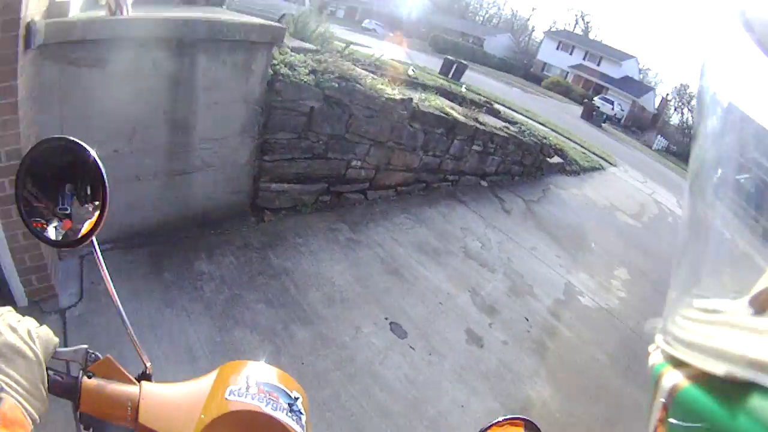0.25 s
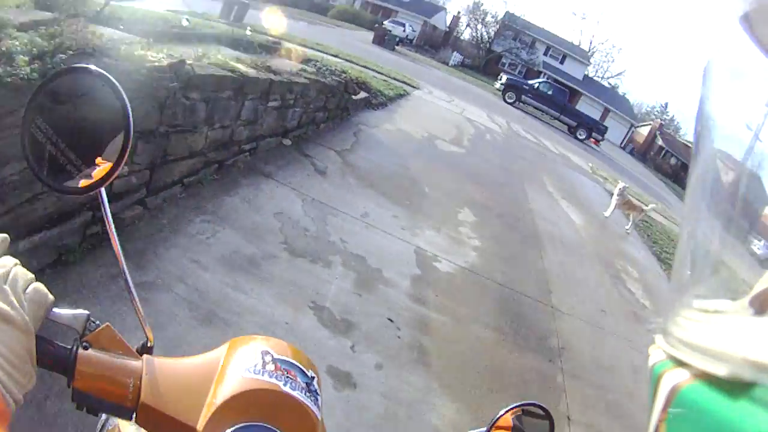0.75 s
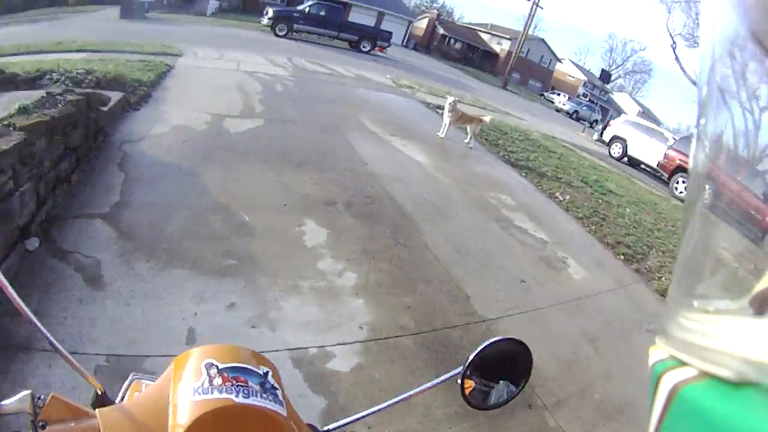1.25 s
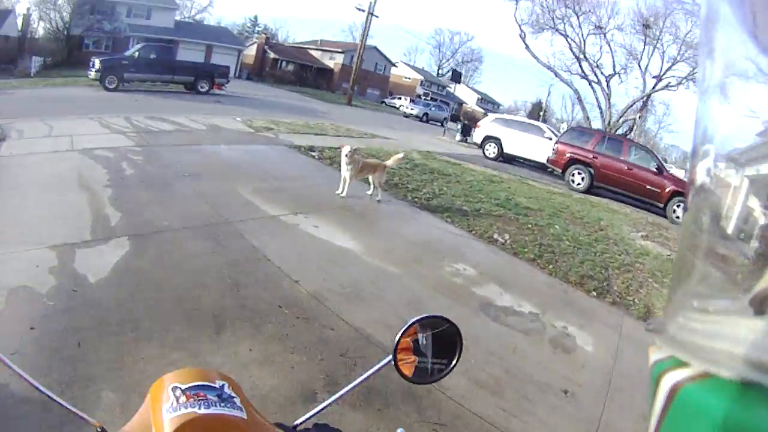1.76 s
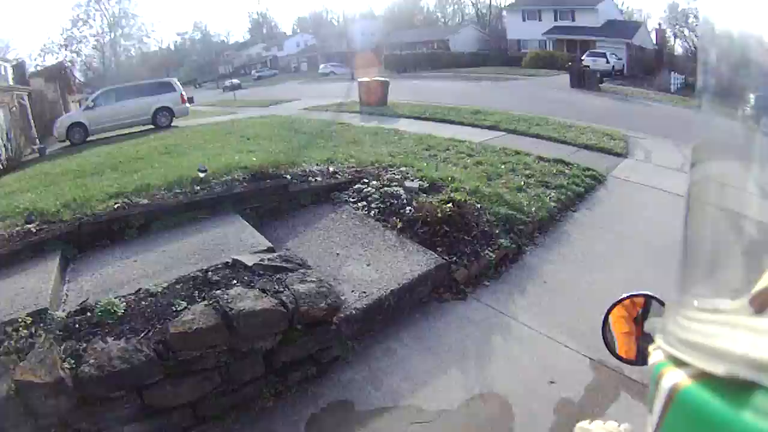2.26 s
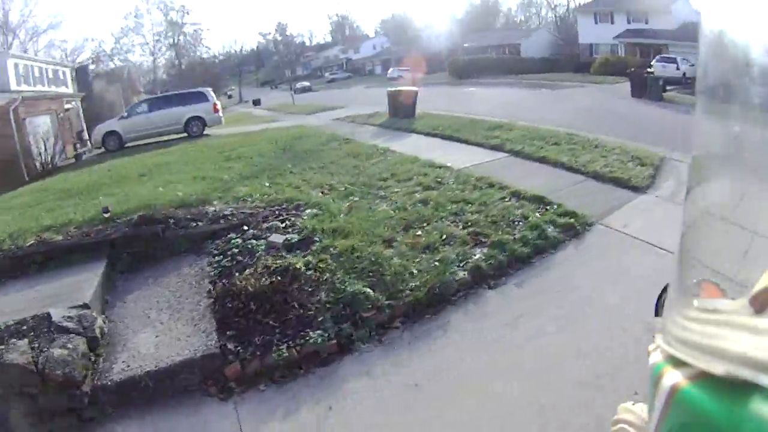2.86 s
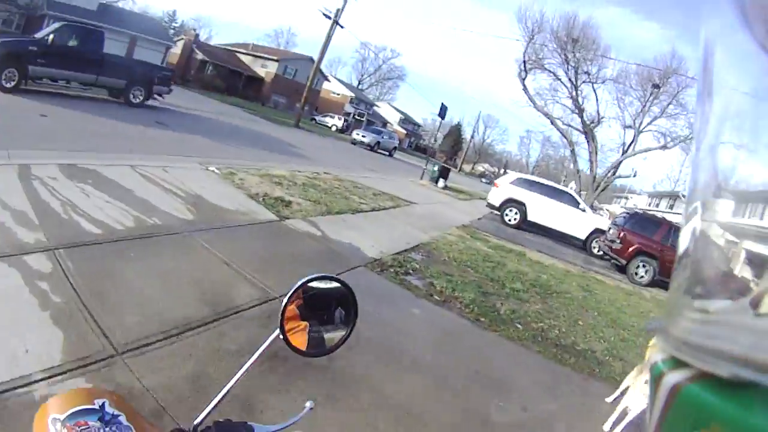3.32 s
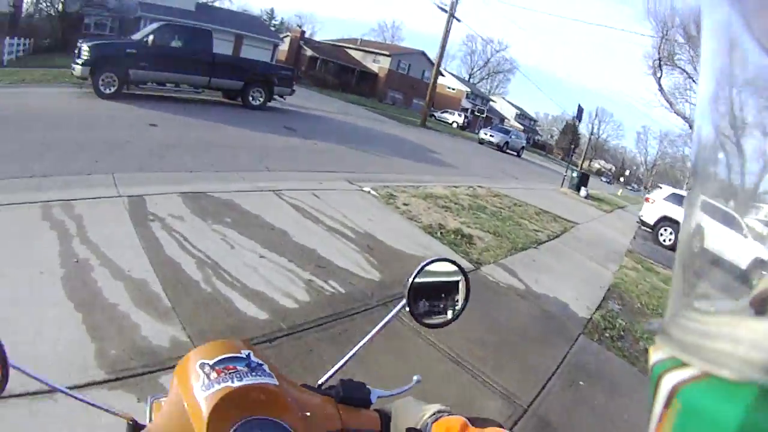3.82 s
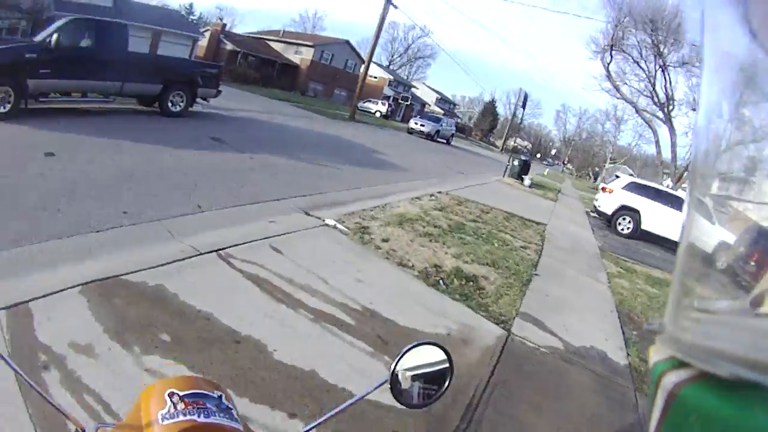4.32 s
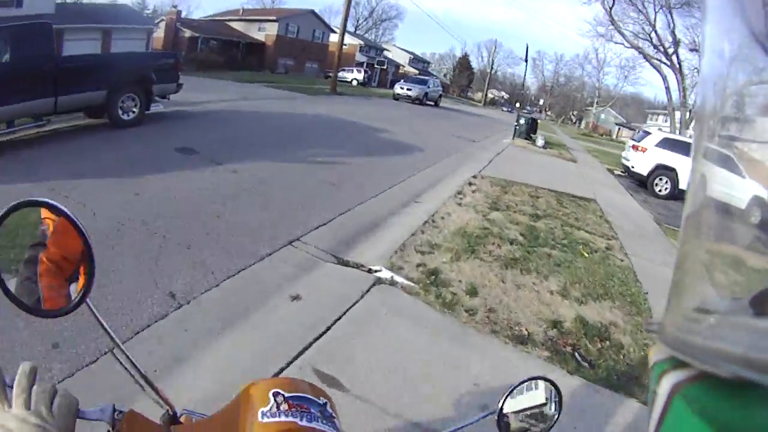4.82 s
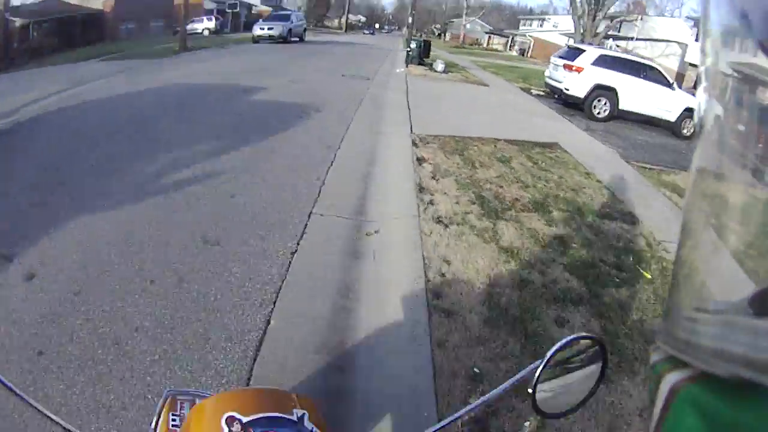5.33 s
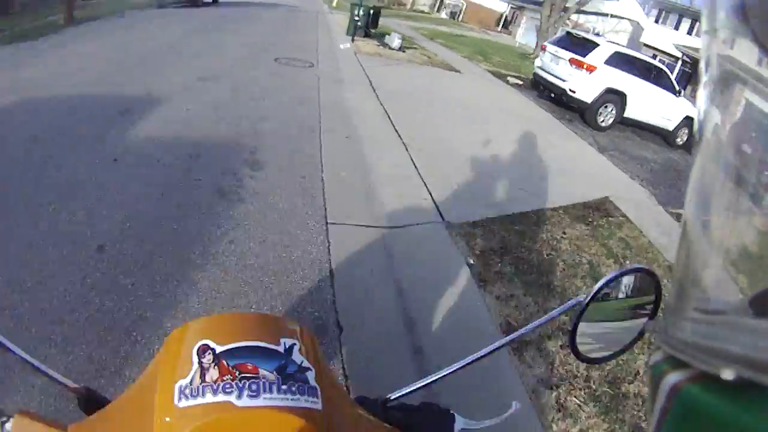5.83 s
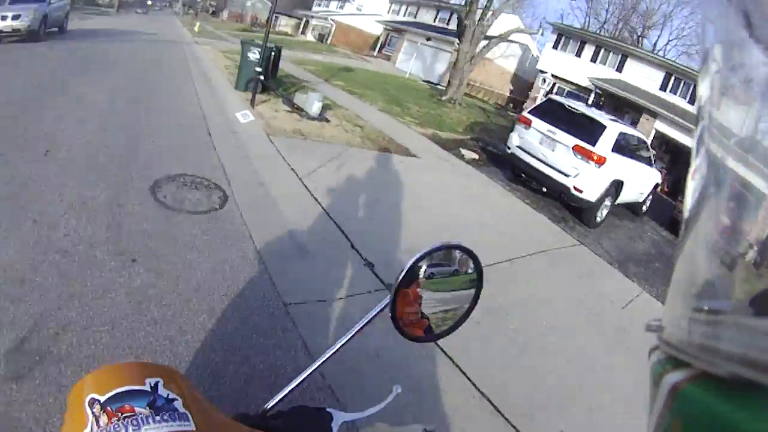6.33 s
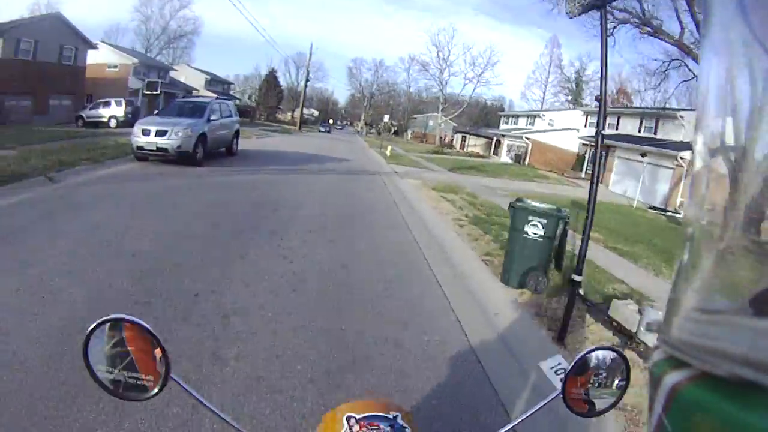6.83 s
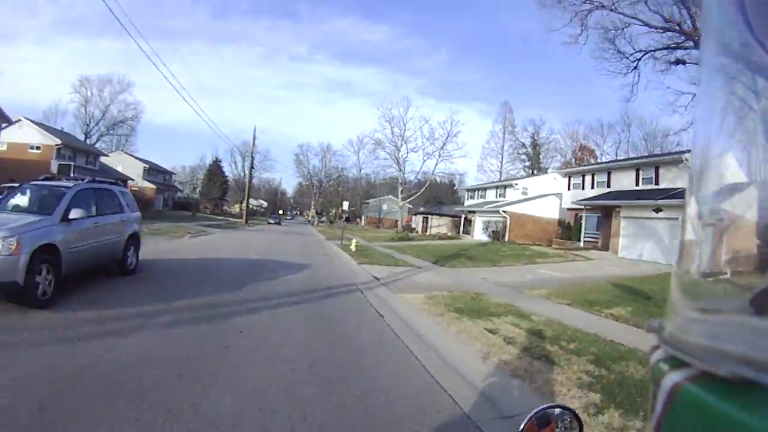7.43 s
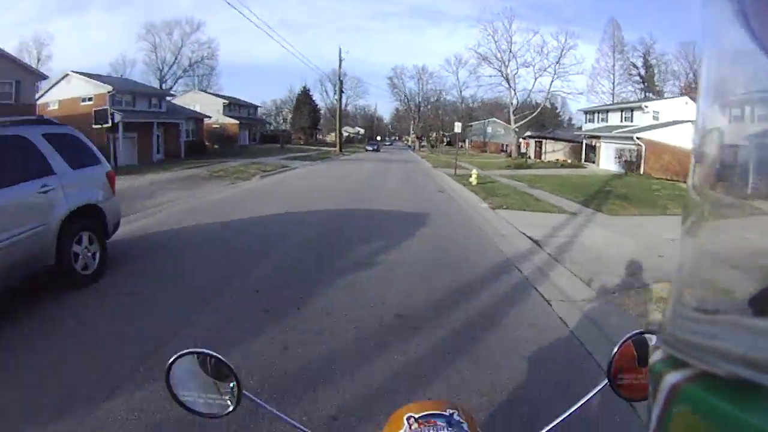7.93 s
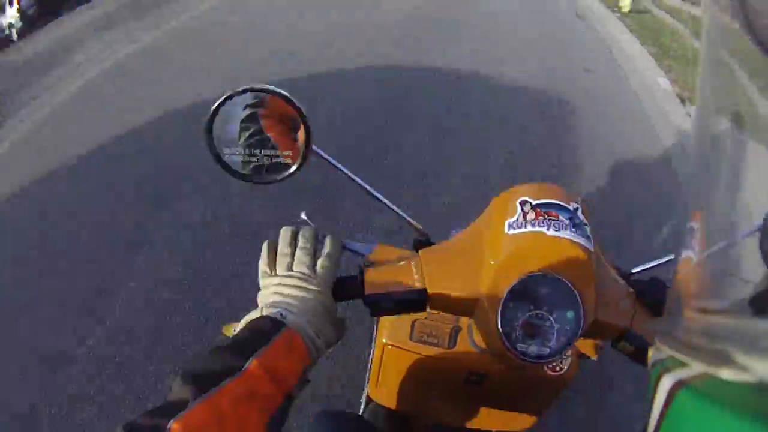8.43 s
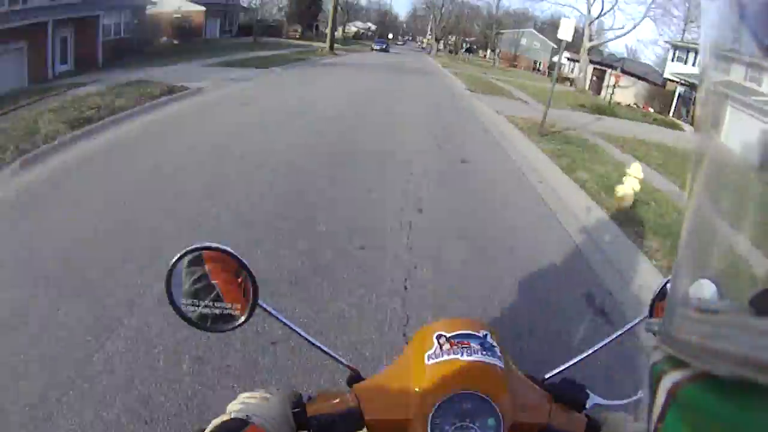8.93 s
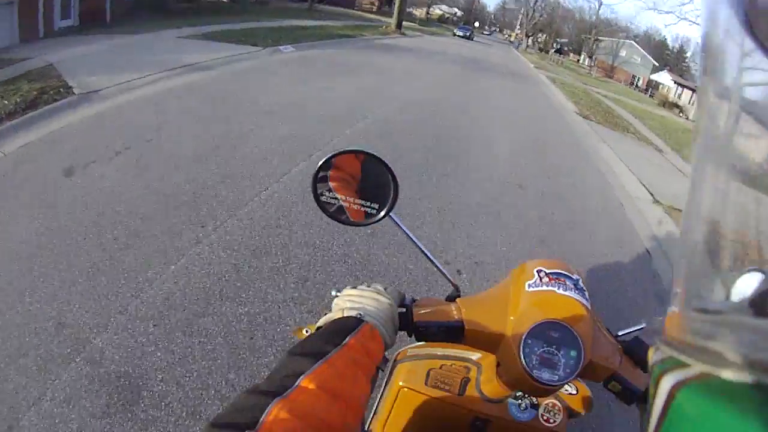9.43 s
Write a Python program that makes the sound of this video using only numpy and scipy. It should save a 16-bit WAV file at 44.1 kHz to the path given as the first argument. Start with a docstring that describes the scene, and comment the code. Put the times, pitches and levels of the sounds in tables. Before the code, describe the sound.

Close from the rider's helmet, an old two-stroke scooter sputters at idle with uneven, hollow exhaust pops and metallic clatter. It rolls down a driveway, rumbling over joints with a hard clunk, then pops louder. The putts merge into a rising buzz, drop and stutter at the gear change, then climb again on the street. Finally wind buffets the microphone over a fading engine.

```python
"""An old two-stroke scooter engine, heard from the rider's helmet, idles unevenly and fires on only some crank turns.
The scooter rolls down a driveway with a clunk, revs through first gear, shifts, and revs again.
Each firing is a click with a puff of noise that sets filters and decaying tones ringing: exhaust, intake, metal.
Most engine parts follow one crank speed curve; lone firings and scrapes have their own times.
Tyres and frame are filtered noise and clicks; filtered noise is also the wind as the rider looks down at speed."""
import sys
import numpy as np
from scipy import signal
from scipy.fft import rfft, irfft
from scipy.io import wavfile
from scipy.ndimage import uniform_filter1d

SR = 44100
rng = np.random.default_rng(int(sys.argv[2]) if len(sys.argv) > 2 else 0)


def wrap_up_sound(samples):
    """Save the sound to the file named by the first command line argument, as 16-bit audio."""
    columns = np.atleast_2d(samples).T
    # keep every value between -1 and 1, then stretch to whole-number steps
    tamed = np.clip(columns, -1, 1)
    steps = np.round(tamed * 32767).astype(np.int16)
    wavfile.write(sys.argv[1], SR, steps)


N = 426447
TIME = np.arange(N) / SR   # the time of every sample, in seconds

# how fast the crank turns: t/s, speed/(turns per s)
CRANK_SPEED = [(0.0, 36.92), (0.713, 41.43), (0.975, 35.19), (1.361, 46.49), (1.775, 43.41), (2.012, 51.2),
               (2.447, 45.84), (3.47, 47.08), (4.046, 38.47), (4.634, 44.76), (5.128, 56.82), (5.39, 65.76),
               (6.036, 78.69), (6.379, 81.5), (6.72, 66.2), (6.8, 58.5), (7.117, 60.75), (7.656, 68.92),
               (8.166, 79.85), (8.82, 86.0), (9.2, 63.0), (9.67, 69.0)]
# lone firings: t/s, strength/dB
POPS = [(.072, -11), (.384, -11.5), (.778, -13), (1.463, -12.5), (1.606, -18), (1.647, -19), (1.706, -16.5),
        (1.75, -14.5), (1.821, -7.5), (1.998, -10), (2.179, -21), (2.35, -16.5), (2.506, -16), (2.674, -12),
        (3.089, -10), (3.261, -7.5), (3.352, -3.5), (3.396, -7), (3.603, -10.5), (3.714, -8.5), (3.807, -9),
        (3.903, -9.5), (4.005, -8), (4.472, -11), (4.586, -8.5), (6.36, -14.5), (6.738, -5.5), (6.802, -8),
        (6.836, -10.5)]
# stretches of firing on every turn: first t/s, last t/s, strength/dB
RUNS = [(0.66, 0.728, -15), (0.829, 1.4, -16), (1.842, 1.906, -14.5), (1.946, 1.983, -22.5),
        (3.417, 3.456, -14), (4.495, 4.54, -14), (4.608, 4.998, -13.5), (5.015, 5.276, -15.5),
        (5.802, 5.843, -16), (5.867, 5.995, -17), (7.137, 7.171, -16.5), (7.202, 7.282, -17.5),
        (7.313, 8.147, -18), (8.16, 8.821, -23), (9.092, 9.66, -26.5)]
# stuttering, a few firings and then a miss: first t/s, last t/s, strength/dB, firings in a row/count
STUTTERS = [(0.208, 0.309, -13.5, 1), (0.487, 0.633, -14, 1), (2.801, 2.933, -18.5, 1),
            (4.081, 4.425, -11, 1), (5.308, 5.387, -16.5, 2), (5.417, 5.532, -16, 2),
            (5.563, 5.678, -16.5, 2), (5.704, 5.773, -16, 2), (6.024, 6.164, -18.5, 2),
            (6.186, 6.31, -18, 1), (6.872, 7.104, -17, 2)]
FIRING_SCATTER_DB = 1.1
FRESH_CHARGE_DB = 2.5   # extra strength after a miss, and at the start of a stretch
STEADY_TURNS_PER_S = 60   # above this speed the firings grow more even

# note of the tailpipe, which follows the gas temperature: t/s, f/Hz
PIPE_NOTE = [(0, 503), (.25, 535), (.39, 520), (.6, 560), (.72, 497), (.84, 560), (.93, 483), (1.02, 487),
             (1.35, 571), (1.6, 452), (1.9, 595), (2.6, 523), (4.6, 520.6), (5.1, 529), (5.36, 534),
             (5.52, 450), (6.2, 693), (7.4, 565), (8.1, 604)]
# part of the exhaust note that goes through the tailpipe's narrow resonance: t/s, share/(0 to 1)
SINGING_SHARE = [(0, 0.83), (.75, 0.61), (1.0, 0.35), (1.33, 0.93), (1.5, 0.4), (3.3, 0.28), (4.9, 0.62),
                 (5.4, 0.18), (9.67, 0)]
# fast flow damps the pipe's echoes: the loss per pass grows as a power of the speed gained above idle
IDLE_TURNS_PER_S, PIPE_IDLE_LOSS_DB, PIPE_ADDED_LOSS_DB, PIPE_LOSS_POWER = 37.3, 7.5, 21.5, 1.3
# tone colour of the exhaust: f/Hz, level/dB
EXHAUST_COLOUR = [(40, -63), (150, -28), (300, -9.5), (400, 2.5), (480, 5.5), (600, -0.5), (720, 2),
                  (800, -14.5), (1000, -33.5), (1250, -44), (2400, -65.5), (7000, -105)]
# silencer resonances, as bumps and dips in that colour: f/Hz, width/Hz, level/dB
SILENCER = [(464.7, 54, 8), (565.6, 56, 8), (560, 340, -5.5), (678.7, 78, 8.5)]
# a dip in the exhaust's tone colour near 960 Hz: f/Hz, width/Hz, level/dB
EXHAUST_DIP = [(960, 130, -8)]
# relative level of the low exhaust note: t/s, level/dB
THUMP_LEVEL = [(0, 6.5), (1.05, 6.5), (1.3, 11.5), (2.3, 3), (4.3, 8), (5.1, 11), (6.2, 7), (7.3, 13),
               (8.7, 7.5), (9.67, 18.5)]
# tone colour of the low exhaust note: f/Hz, level/dB
THUMP_COLOUR = [(30, -46), (70, -26), (120, -19.5), (250, 1.5), (330, -13), (500, -12), (1500, -76),
                (5000, -97)]
# airbox resonances, as bumps and dips in that colour: f/Hz, width/Hz, level/dB
AIRBOX = [(160.4, 54, 15.5), (183.2, 95, -13), (275.8, 8.1, 6)]
# the deepest part of the low note grows with the revs
DEEP_HZ, DEEP_FULL_TURNS_PER_S, DEEP_GROWTH = 170, 110, 0.94
# relative level of the hollow bark of the firings: t/s, level/dB
BARK_LEVEL = [(1.9, -27), (2.35, -5), (3.1, -3.5), (3.3, -45), (5.5, -17.5), (9.67, -11)]
# ringing tones of the bark: f/Hz, level/dB, time to fall by 60 dB/s
BARK_MODES = [(945, -7.5, 0.076), (1015, -9.5, 0.071), (1104, -17.5, 0.083)]
# tone colour of the rasp and of the shaking panels: f/Hz, level/dB
RASP_COLOUR = [(50, -54.5), (300, -9.5), (700, 4), (900, 10), (1150, -8), (1500, 0.5), (1900, -12.5),
               (2350, -12.5), (3000, -29), (4500, -32.5), (6500, -46), (8000, -52), (14000, -63.5)]
# moments when the silencer rings on between firings: first t/s, last t/s, f/Hz, level/dB
DRONES = [(0.912, 1.04, 470.4, -27), (1.888, 1.95, 725, -29), (1.975, 2.003, 551.3, -23),
          (2.166, 2.19, 545, -19.5)]
DRONE_T60_S = 0.33   # time to fall by 60 dB
# swells of one crank harmonic in a silencer resonance: first t/s, last t/s, multiple of crank speed, level/dB
HUMS = [(.93, 1.05, 21, -33.5), (1.814, 1.89, 5, -28.5), (1.91, 2.122, 14, -31), (6.56, 6.694, 8, -39.5),
        (6.583, 6.698, 7, -34), (6.403, 6.66, 6, -40), (7.85, 8.13, 4, -35)]
# level of the bright spit of gas with each firing: t/s, level/dB
SPIT_LEVEL = [(0, -47.5), (.7, -55.5), (.9, -47.5), (1.1, -58.5), (1.35, -49.5), (2.6, -49.5), (3.4, -60),
              (4.3, -51), (4.8, -64), (5.3, -56), (5.55, -46.5), (6.1, -64), (6.9, -51.5), (7.5, -68.5),
              (9.67, -60.5)]
# tone colour of the spit: f/Hz, level/dB
SPIT_COLOUR = [(400, -22), (1100, 11), (1700, 4.5), (2300, 0.5), (2800, -10), (3300, -5.5), (4000, -20),
               (5000, -20.5), (6300, -22.5), (7500, -36.5), (14000, -40.5)]

# level of the intake's gulp: t/s, level/dB
GULP_LEVEL = [(0, -43), (4.5, -35), (5.2, -34), (6.0, -25), (7.0, -24.5), (7.7, -18.5), (8.15, -21.5),
              (9.0, -42.5), (9.67, -33)]
# tone colour of the intake: f/Hz, level/dB
INTAKE_COLOUR = [(40, -47.5), (140, -5), (280, -7.5), (450, 1), (700, -4), (850, -13.5), (1300, -41.5),
                 (5000, -88)]
# ports opening on each turn, fired or not: share of a turn, level/dB
PORTS = [(0, 4.5), (0.363, -3), (0.621, -0.5)]
# engine background: t/s, level of air pumped through the silencer/dB, level of clatter/dB
RUNNING_LEVELS = [(0, -29, -39), (1.9, -31, -39), (2.4, -35, -41), (3.05, -27.5, -38.5),
                  (3.4, -29.5, -43.5), (6.6, -29, -42), (7.4, -26, -45), (8.15, -19, -49),
                  (8.9, -41.5, -66), (9.67, -54.5, -50)]
# tone colour of the clatter: f/Hz, level/dB
CLATTER_COLOUR = [(50, -48.5), (300, 10.5), (800, 12), (1150, -2), (1500, 1), (1900, -6.5), (2400, -8.5),
                  (2900, -16.5), (3500, -22.5), (4300, -29), (6400, -35.5), (7800, -41.5), (14000, -59.5)]
# stretches where the engine's metalwork rattles harder: first t/s, last t/s, level/dB
RATTLES = [(1.36, 1.6, -40), (1.78, 2.0, -52), (2.5, 3.1, -42), (5.47, 5.62, -44), (6.56, 6.72, -39)]
# level of the drive chain's buzz: t/s, level/dB
CHAIN_LEVEL = [(0, -77.5), (4.3, -66), (5.0, -74.5), (6.3, -73.5), (6.6, -72), (6.9, -56.5), (7.55, -63.5),
               (7.7, -58.5), (8.2, -58), (8.8, -64), (9.2, -67.5), (9.67, -44)]
# tone colour of the chain: f/Hz, level/dB
CHAIN_COLOUR = [(400, -20), (950, -6), (1080, -1), (1250, -5), (1700, 2), (2000, -8), (2400, -11),
                (3000, -23), (3500, -24), (3750, -19), (4100, -36), (5600, -30), (6400, -31), (7600, -46),
                (14000, -60)]
CHAIN_SCATTER_DB, CHAIN_JITTER_S = 2.5, .00012
# stretches where the cylinder fins ring harder with the firings: first t/s, last t/s, level/dB
PINGS = [(.83, 1.36, -44.5), (5.47, 5.57, -48), (9.24, 9.5, -62)]
# ringing tones of two fins: f/Hz, level/dB, time to fall by 60 dB/s
FIN_MODES = [(2330, 0, .04), (2420, 0, .05)]
PING_REST_DB = -67   # the fins' faint ring with firings outside those stretches
# whine of the gears: first t/s, last t/s, level at first/dB, build-up/(dB per s)
WHINES = [(6.43, 6.72, -51, 45), (7.75, 8.12, -57, 10)]
# partials of the whine: multiple of crank speed, level/dB, phase wander/radians
WHINE_PARTIALS = [(16, 0, .5), (30, -20, 1.2), (49, -27, 2.5)]
WHINE_ATTACK_S = .05
# buzzing of a thin loose part on every firing: first t/s, last t/s, level/dB
BUZZES = [(6.8, 7.33, -68.5), (7.645, 8.2, -64), (9.22, 9.5, -69.5)]
# ringing tones of that part: f/Hz, level/dB, time to fall by 60 dB/s
BUZZ_MODES = [(3700, -3, .03), (4870, -5.5, .03), (5420, -2, 0.02), (5950, -5, .025)]
# short metallic scrapes: first t/s, last t/s, level/dB
SCRAPES = [(1.814, 1.84, -49), (2.02, 2.032, -54)]
# tone colour of the scrapes: f/Hz, level/dB
SCRAPE_COLOUR = [(800, -26), (1800, -8), (2400, 5), (2800, 2), (3300, 2), (3900, -16), (6500, -22),
                 (8000, -33), (14000, -45.5)]

# steady tyre rumble: t/s, level/dB
ROAD_LEVEL = [(0, -35.5), (1.7, -41), (2.1, -42), (2.5, -34.5), (3.6, -38.5), (4.4, -33), (4.8, -43),
              (6.4, -35), (7.5, -46), (9.67, -46)]
# rough patches of paving: first t/s, last t/s, rumble level/dB
PATCHES = [(1.795, 1.88, -29), (2.22, 2.3, -29.5), (2.5, 2.68, -33), (2.76, 2.87, -27.5),
           (4.15, 4.45, -37.5), (6.48, 6.73, -32), (7.64, 7.67, -37.5)]
# tone colour of the tyre rumble: f/Hz, level/dB
RUMBLE_COLOUR = [(25, -44.5), (60, -18.5), (100, -7.5), (150, 2), (250, 5), (400, 0.5), (700, -8),
                 (1000, -26.5), (3000, -69.5)]
# knocks of the frame over joints in the paving: t/s, peak level/dB
KNOCKS = [(1.797, -17), (2.246, -19.5), (2.262, -25), (2.298, -19), (2.817, -27), (3.147, -15), (3.16, -5),
          (3.17, -11.5), (5.958, -13), (6.516, -21), (6.707, -24), (6.714, -10.5)]
# tone colour of a knock: f/Hz, level/dB
KNOCK_COLOUR = [(25, -6.5), (60, -22.5), (200, 2), (320, 2.5), (480, -4.5), (1000, -31), (3000, -67),
                (9000, -87.5)]
# small sharp ticks: t/s, peak level/dB
TICKS = [(3.161, -26), (4.172, -39), (5.56, -39), (5.567, -31)]
# tone colour of a tick: f/Hz, level/dB
TICK_COLOUR = [(300, -44.5), (1500, 23.5), (3500, -6), (7000, -20), (12000, -14), (14000, -33)]
# light clicks of loose fittings: t/s, peak level/dB
CLACKS = [(8.917, -27), (9.023, -35), (9.053, -30), (9.137, -28), (9.149, -26), (9.206, -28.5),
          (9.291, -37), (9.363, -23)]
# tone colour of those clicks: f/Hz, level/dB
CLACK_COLOUR = [(300, -11), (1200, 20.5), (2000, 0), (3500, -13.5), (4500, -25), (6500, -29.5), (9000, -50)]

# steady airflow over the microphone: t/s, level/dB
AIRFLOW_LEVEL = [(0, -78.5), (8.08, -55), (8.2, -37), (9.0, -41), (9.67, -34.5)]
# gusts as the head dips into the airstream: first t/s, last t/s, level at first/dB, build-up/(dB per s)
GUSTS = [(8.241, 8.747, -26, 1), (8.62, 8.69, -32.5, 0), (9.407, 9.675, -29.5, 21.5),
         (9.563, 9.675, -28.5, 11)]
# tone colour of the wind: f/Hz, level/dB
WIND_COLOUR = [(25, -47), (80, -22.5), (150, -5.5), (310, 2), (450, 1), (700, -2), (1000, -6.5),
               (1600, -14), (2400, -21), (3500, -32.5), (5000, -46), (6500, -59.5), (8000, -71),
               (14000, -71)]
GUST_ATTACK_S, GUST_RELEASE_S, GUST_FLUTTER_DB = 0.051, 0.12, 3
# rasping of the airstream across a helmet edge: first t/s, last t/s, level/dB
EDGE_RASPS = [(8.6, 8.72, -44), (9.436, 9.452, -33), (9.46, 9.55, -41), (9.6, 9.67, -37)]
# tone colour of that rasp: f/Hz, level/dB
EDGE_COLOUR = [(300, -29), (1000, 0), (1350, 9), (1700, 3.5), (2200, -5), (3000, -22), (5000, -35),
               (9000, -56.5)]

CUTOFF_HZ = 14000   # nothing much is left above this
LIMIT_DB, LIMIT_SHARE = -14.5, 0.3   # limiter: level, and share of each dB taken back well above it


def firings(turns, scatter_db, lead_s):
    """Times and strengths of all combustions; in runs and stutters they follow the crank."""
    fired = list(POPS)
    never_miss = len(TIME)   # a run is a stutter with no misses
    for first, last, db, in_a_row in STUTTERS + [(*run, never_miss) for run in RUNS]:
        a, b = np.interp([first, last], TIME, turns)
        count = int(round(b - a)) + 1
        place = np.arange(count) % (round(in_a_row) + 1)
        fires = place < round(in_a_row)
        fires[-1] = True   # every stretch ends on a firing
        moments = np.interp(np.linspace(a, b, count), turns, TIME)
        fired += zip(moments[fires], db + FRESH_CHARGE_DB * (place[fires] == 0))
    times, levels = np.transpose(fired)
    scatter = rng.standard_normal(1024)[:len(times)]
    unevenness = np.minimum(STEADY_TURNS_PER_S * turn_s(times), 1) ** 2
    # the port opens just before the ring peaks
    return times - lead_s, from_db(levels + scatter_db * unevenness * scatter)


def exhaust(times, strength, ring_db, thump_db, thump_growth, rasp_db, rasp_s, buzz_db,
            chamber_hz, chamber_db, chamber_t60, chamber_growth):
    """Each firing is a pressure step and a turbulent puff that ring the silencer, the airbox and the panels."""
    blows = repeat_early(clicks(times, strength), delay_s=0.00944, echo_db=-3.5, until_s=.65)
    puffs = blows + from_db(-40) * fade(blows, decay_s=.005) * rng.standard_normal(N)
    note = from_db(ring_db) * sing(tailpipe(puffs), width_hz=90, peak_db=4)
    # the faster the port opens, the harder it drives the silencer's small rear chamber
    speed = in_time(CRANK_SPEED)
    drive = puffs * (speed / speed.max()) ** chamber_growth
    note += ring(drive, [(chamber_hz, chamber_db, chamber_t60)])
    # the low note follows the swept volume, so it grows less with the force of the firing
    swept = clicks(times, strength ** thump_growth)
    thump = from_db(thump_db + in_time(THUMP_LEVEL)) * deepen(body(swept, THUMP_COLOUR, AIRBOX))
    # a gas pulse has no hard edge
    soft_puffs = signal.sosfilt(signal.butter(2, 1500, fs=SR, output="sos"), puffs)
    bark = ring(soft_puffs * from_db(in_time(BARK_LEVEL)), BARK_MODES)
    note += drones(times)
    panel_shake = from_db(buzz_db) * panels(swept, rise_s=0.0076, decay_s=0.0038)
    rasp = from_db(rasp_db) * fade(blows, rasp_s) * rng.standard_normal(N)
    return note + thump + bark + body(panel_shake + rasp, RASP_COLOUR)


def repeat_early(blows, delay_s, echo_db, until_s):
    """Each early idle firing is followed about 9 ms later by a second, weaker copy of itself."""
    early = blows * (TIME < until_s)
    return blows + from_db(echo_db) * np.interp(TIME - delay_s, TIME, early, left=0)


def tailpipe(x, count=4):
    """A pressure wave runs up and down the pipe, so each putt comes out as a short row of weakening copies."""
    note_hz = in_time(PIPE_NOTE)
    gained = np.maximum(in_time(CRANK_SPEED) - IDLE_TURNS_PER_S, 0)
    loss_db = PIPE_IDLE_LOSS_DB + PIPE_ADDED_LOSS_DB * (gained / gained.max()) ** PIPE_LOSS_POWER
    loss_db = np.maximum(loss_db, 0)
    gains = [from_db(-k * loss_db) for k in range(count)]
    passes = sum(gain * np.interp(TIME - k / note_hz, TIME, x, left=0) for k, gain in enumerate(gains))
    # about the same energy leaves the pipe, however strong the later passes are
    even = passes / np.sqrt(np.sum(np.square(gains), axis=0))
    return body(even, EXHAUST_COLOUR, SILENCER + EXHAUST_DIP)


def sing(note, width_hz, peak_db):
    """The tailpipe's resonance glides with the gas temperature and draws each putt out into a short tone."""
    carrier = np.exp(2j * np.pi * np.cumsum(in_time(PIPE_NOTE)) / SR)
    r = np.exp(-np.pi * width_hz / SR)
    # shift the moving note down to 0 Hz, smooth it there, and shift it back
    tone = 2 * np.real(carrier * signal.lfilter([1 - r], [1, -r], note / carrier))
    share = np.clip(in_time(SINGING_SHARE), 0, 1)
    return (1 - share) * note + share * from_db(peak_db) * tone


def deepen(thump):
    """The faster the crank turns, the more weight the bottom of the exhaust note has."""
    deep = signal.sosfilt(signal.butter(1, DEEP_HZ, fs=SR, output="sos"), thump)
    return thump - deep + deep * (in_time(CRANK_SPEED) / DEEP_FULL_TURNS_PER_S) ** DEEP_GROWTH


def drones(times):
    """Now and then the firings catch one resonance of the silencer and it hoots."""
    blows = clicks(times, 1.0)
    out = 0
    for first, last, hz, db in DRONES:
        caught = blows * swells([(first, last, db)], attack_s=0.016, release_s=0.016)
        out = out + ring(caught, [(hz, 0, DRONE_T60_S)])
    return out


def hums(turns, waver_db):
    """Single crank harmonics meet a silencer resonance and stand out of the exhaust note for a moment."""
    tones = 0
    for first, last, order, db in HUMS:
        level = swells([(first, last, db)], attack_s=.03, release_s=0.032)
        tones = tones + level * np.sin(2 * np.pi * round(order) * turns)
    return tones * from_db(waver_db * drift(25))


def spit(times, lead_s, decay_s):
    """Gas hisses out as the port cracks open, just ahead of the putt."""
    puffs = fade(clicks(times - lead_s, 1.), decay_s) * rng.standard_normal(N)
    return from_db(in_time(SPIT_LEVEL)) * rms_one(body(puffs, SPIT_COLOUR))


def intake(times, share):
    """A set share of a turn after each firing the engine gulps air through the airbox."""
    return from_db(in_time(GULP_LEVEL)) * body(clicks(times + share * turn_s(times), 0.6), INTAKE_COLOUR)


def port_clicks(turns, scatter_db):
    """The piston uncovers its ports at the same angles on every turn."""
    out = 0
    for share, db in PORTS:
        times = np.interp(np.arange(int(turns[-1]) - 1) + share, turns, TIME)
        scatter = rng.standard_normal(1024)[:len(times)]
        out = out + clicks(times, from_db(db + scatter_db * scatter))
    return out


def pumping(strokes, times, level_db, intake_db, turbulence_db, smoothing_db):
    """Unfired turns still push air through silencer and airbox; at high revs the strokes stand out of the hiss."""
    speed = in_time(CRANK_SPEED)
    hiss = from_db(turbulence_db - smoothing_db * speed / speed.max()) * rng.standard_normal(N)
    flow = rms_one(strokes) + hiss
    air = rms_one(body(flow, EXHAUST_COLOUR, SILENCER))
    air += from_db(intake_db) * rms_one(body(flow, THUMP_COLOUR, AIRBOX))
    return from_db(level_db) * (1 - pulling(times)) * air


def pulling(times):
    """Close to 1 while the engine fires on each turn, 0 while it misses or coasts."""
    since = TIME - np.maximum.accumulate(np.where(clicks(times, 1.) > 0, TIME, -1))
    return uniform_filter1d(1. * (since < 1 / in_time(CRANK_SPEED)), size=600)


def clatter(strokes, slap_s, fan_db, beat_db):
    """Piston slap and chain rattle on each stroke, over the hiss of the cooling fan."""
    rattle = (rms_one(fade(strokes, slap_s)) + from_db(fan_db)) * rng.standard_normal(N)
    beat = from_db(beat_db) * rms_one(panels(strokes, rise_s=0.00016, decay_s=0.012))
    return rms_one(body(rms_one(rattle) + beat, CLATTER_COLOUR))


def chain(times, share, decay_s, scatter_db):
    """Each power stroke snatches the drive chain: a bright tick, a little different in strength every time."""
    scatter, slack = rng.standard_normal((1024, 2))[:len(times)].T
    moments = times + share * turn_s(times) + CHAIN_JITTER_S * slack
    ticks = panels(clicks(moments, from_db(scatter_db * scatter)), rise_s=0.00012, decay_s=decay_s)
    return from_db(in_time(CHAIN_LEVEL)) * rms_one(body(ticks, CHAIN_COLOUR))


def fins(times, lead_s, shiver_db):
    """Ignition, just before the port opens, strikes two fins that swing against each other: a soft ping."""
    blows = clicks(times - lead_s, 0.92)
    blows = blows + from_db(shiver_db) * fade(blows, decay_s=0.016) * rng.standard_normal(N)
    blows = blows * (from_db(PING_REST_DB) + swells(PINGS, attack_s=0.049, release_s=0.034))
    return ring(blows, FIN_MODES[:1]) - ring(blows, FIN_MODES[1:])


def gears(turns, waver_db):
    """The teeth mesh at multiples of the crank speed, a little unsteadily; higher partials are more blurred."""
    level = 0
    for *whine, build in WHINES:
        level = level + swells([whine], attack_s=WHINE_ATTACK_S, release_s=0.016, build_db_per_s=build)
    teeth = 0
    for order, db, wander in WHINE_PARTIALS:
        teeth = teeth + from_db(db) * np.sin(2 * np.pi * order * turns + wander * drift(60))
    return level * from_db(waver_db * drift(21)) * teeth


def loose_parts(times):
    """A thin part chatters with the firings; metal scrapes briefly."""
    chatter = from_db(-20) * fade(clicks(times, 1.), decay_s=.004) * rng.standard_normal(N)
    buzz = ring(chatter * swells(BUZZES, attack_s=.01, release_s=.02), BUZZ_MODES)
    scrape = rms_one(body(rng.standard_normal(N), SCRAPE_COLOUR))
    return buzz + swells(SCRAPES, attack_s=.002, release_s=.008) * scrape


def road():
    """Tyre rumble that swells on rough patches, knocks of the frame, small ticks and loose fittings."""
    patches = swells(PATCHES, attack_s=0.015, release_s=0.065)
    roughness = np.hypot(from_db(in_time(ROAD_LEVEL)), patches)
    noise = rms_one(body(rng.standard_normal(N), RUMBLE_COLOUR))
    rumble = roughness * from_db(1.5 * drift(15)) * noise
    return rumble + strikes(KNOCKS, KNOCK_COLOUR) + strikes(TICKS, TICK_COLOUR) + strikes(CLACKS, CLACK_COLOUR)


def wind(buffet_db, flutter_db, split_hz, brightening, treble_db):
    """Eddies buffet the microphone; the small ones flutter faster, sound higher and grow most in a gust."""
    gusts = sum(swells([gust], GUST_ATTACK_S, GUST_RELEASE_S, build) for *gust, build in GUSTS)
    force = from_db(in_time(AIRFLOW_LEVEL)) + gusts
    air = rms_one(body(rng.standard_normal(N), WIND_COLOUR))
    low = signal.sosfilt(signal.butter(1, split_hz, fs=SR, output="sos"), air)
    treble_gain = from_db(treble_db + flutter_db * drift(150)) * (force / force.max()) ** brightening
    eddies = low + (air - low) * treble_gain
    return force * eddies * from_db(buffet_db * drift(36))


def edge_rasp():
    """Fast air shedding eddies off an edge: a hoarse band of hiss."""
    hiss = rms_one(body(rng.standard_normal(N), EDGE_COLOUR))
    return swells(EDGE_RASPS, attack_s=0.005, release_s=.012) * hiss


def from_db(db):
    """Decibels to gain."""
    return 10 ** (np.asarray(db) / 20)


def rms_one(x):
    """Scale to an average power of 1."""
    return x / np.sqrt(np.mean(x ** 2) + 1e-20)


def in_time(rows):
    """Each column of a curve at every sample, in straight lines between its points."""
    s, *columns = np.transpose(rows)
    return np.squeeze([np.interp(TIME, s, c) for c in columns])


def turn_s(times):
    """Length of a crank turn, in seconds, at those moments."""
    return 1 / np.interp(times, *np.transpose(CRANK_SPEED))


def drift(rate):
    """Smooth random wandering with a spread of 1; a higher rate wanders faster."""
    r = np.exp(-80 * np.pi * rate / SR)
    # made at one value per 40 samples; the filter's first 2000 values are dropped
    slow = signal.lfilter([1], [1, -2 * r, r * r], rng.standard_normal(N // 40 + 2002))[2000:]
    return np.interp(np.arange(N) / 40, np.arange(len(slow)), rms_one(slow))


def clicks(times, heights):
    """One single-sample impulse at each time."""
    out = np.zeros(N)
    np.add.at(out, np.clip(np.round(times * SR).astype(int), 0, N - 1), heights)
    return out


def fade(x, decay_s):
    """Each click becomes a dying envelope."""
    return signal.lfilter([1], [1, -np.exp(-1 / (decay_s * SR))], x + 1e-18)


def swells(rows, attack_s, release_s, build_db_per_s=0):
    """Gain of events that rise, hold or build from their first to their last second, and die away."""
    out = 0
    for first, last, db in rows:
        held = from_db(db + build_db_per_s * np.clip(TIME - first, 0, last - first))
        early, late = np.maximum(first - TIME, 0), np.maximum(TIME - last, 0)
        out = out + held * np.exp(-early / attack_s - late / release_s)
    return out


def body(x, colour, resonances=(), size=8192):
    """Filter with a tone colour and resonances; a unit click comes out with peak 1."""
    hz = np.maximum(np.arange(size // 2 + 1) * SR / size, 1)
    points = np.array(colour)
    db = np.interp(np.log(hz), np.log(points[:, 0]), points[:, 1])
    for centre, width, peak_db in resonances:
        db = db + peak_db / (1 + (2 * (hz - centre) / width) ** 2)
    cepstrum = irfft(np.log(from_db(db)))[:size // 2]
    cepstrum[0] /= 2
    response = irfft(np.exp(rfft(2 * cepstrum, size)))   # minimum phase: nothing sounds early
    return signal.oaconvolve(x, response / np.abs(response).max())[:N]


def ring(x, modes):
    """Clicks set decaying sines going."""
    out = 0
    for hz, db, t60 in modes:
        r, w = from_db(-60 / (t60 * SR)), 2 * np.pi * hz / SR
        sine = signal.lfilter([0, np.sin(w)], [1, -2 * r * np.cos(w), r * r], x + 1e-18)
        out = out + from_db(db) * sine
    return out


def panels(x, rise_s, decay_s, size=2048):
    """Sheet metal's dense modes swell and die in the same way after every blow; unit energy."""
    t = np.arange(size) / SR
    response = rng.standard_normal(size) * (1 - np.exp(-t / rise_s)) * np.exp(-t / decay_s)
    return signal.oaconvolve(x, response / np.linalg.norm(response))[:N]


def strikes(rows, colour):
    """A table of blows on one object."""
    times, db = np.transpose(rows)
    return body(clicks(times, from_db(db)), colour)


def limit(x, size=80):
    """A quick, soft limiter takes back a share of each dB above its level, flattening the loudest putts."""
    power = uniform_filter1d(x ** 2, size=size, axis=-1)
    over = uniform_filter1d(power, size=size, axis=-1) / from_db(LIMIT_DB) ** 2
    return x * (1 + over ** 2) ** (-LIMIT_SHARE / 2 / 2)


def scene():
    """The crank and the firings time the engine sounds; road and wind lie around them."""
    turns = np.cumsum(in_time(CRANK_SPEED)) / SR   # crank turns made so far
    pump_db, clatter_db = in_time(RUNNING_LEVELS)
    clatter_gain = np.hypot(from_db(clatter_db), swells(RATTLES, attack_s=0.033, release_s=0.016))
    times, strength = firings(turns, scatter_db=FIRING_SCATTER_DB, lead_s=.0028)
    strokes = port_clicks(turns, scatter_db=2.2)
    engine = exhaust(times, strength, ring_db=3.5, thump_db=-16.5, thump_growth=0.84,
                     rasp_db=-48.5, rasp_s=0.0084, buzz_db=-16.5,
                     chamber_hz=690, chamber_db=-25.0, chamber_t60=0.048, chamber_growth=9.7)
    engine += hums(turns, waver_db=2)
    engine += spit(times, lead_s=.004, decay_s=0.0092)
    engine += intake(times, share=0.5025)
    engine += pumping(strokes, times, pump_db, intake_db=-13, turbulence_db=4.5, smoothing_db=7.5)
    engine += clatter_gain * clatter(strokes, slap_s=0.0057, fan_db=5.5, beat_db=-4.5)
    engine += chain(times, share=.82, decay_s=0.00067, scatter_db=CHAIN_SCATTER_DB)
    engine += fins(times, lead_s=0.006, shiver_db=-29)
    engine += gears(turns, waver_db=2)
    engine += loose_parts(times)
    air = wind(buffet_db=0.5, flutter_db=GUST_FLUTTER_DB, split_hz=980, brightening=0.74, treble_db=-1.5)
    return (engine + road() + air + edge_rasp())[None]


def record(dry):
    """The small microphone loses the deep bass, a limiter eases the peaks; the top is cut."""
    thin = signal.sosfilt(signal.butter(2, 45, "high", fs=SR, output="sos"), dry)
    return signal.sosfilt(signal.cheby2(12, 70, CUTOFF_HZ, fs=SR, output="sos"), limit(thin))


dry = scene()
out = record(dry)
wrap_up_sound(out)
```